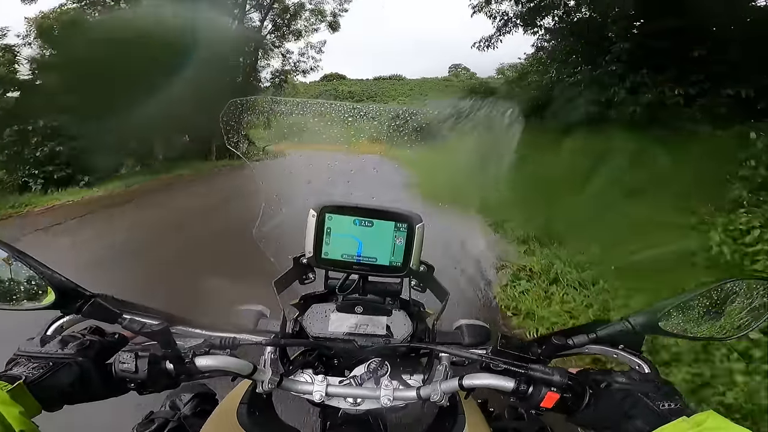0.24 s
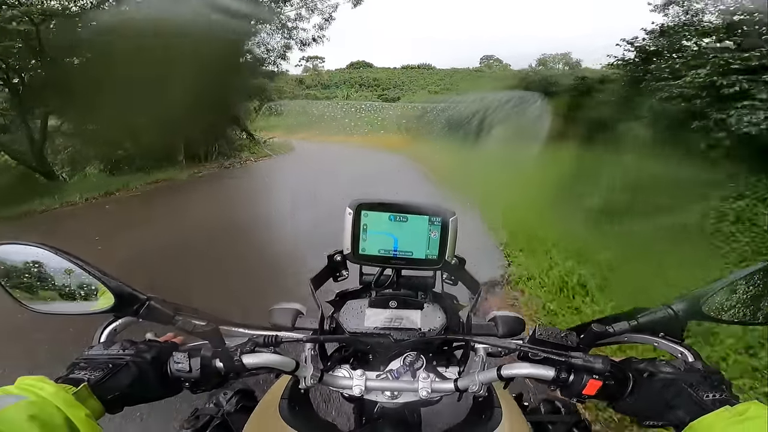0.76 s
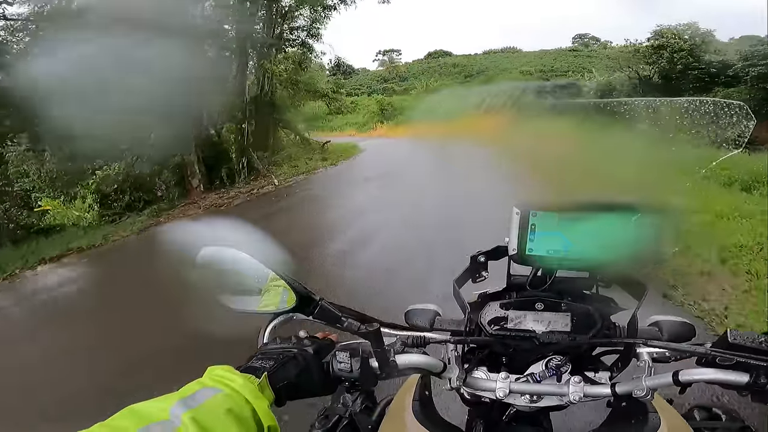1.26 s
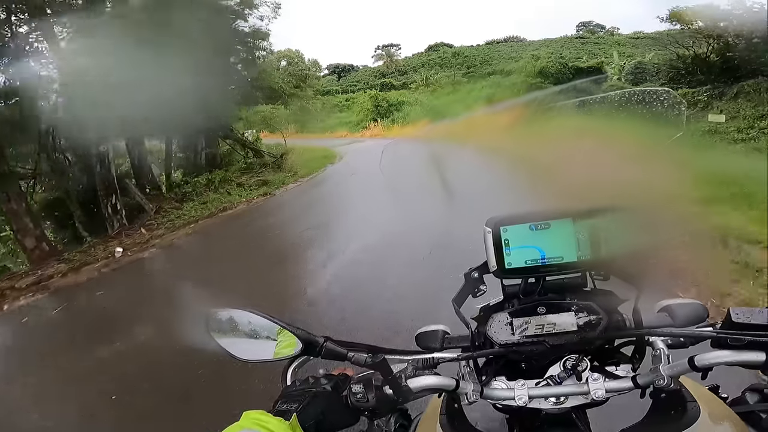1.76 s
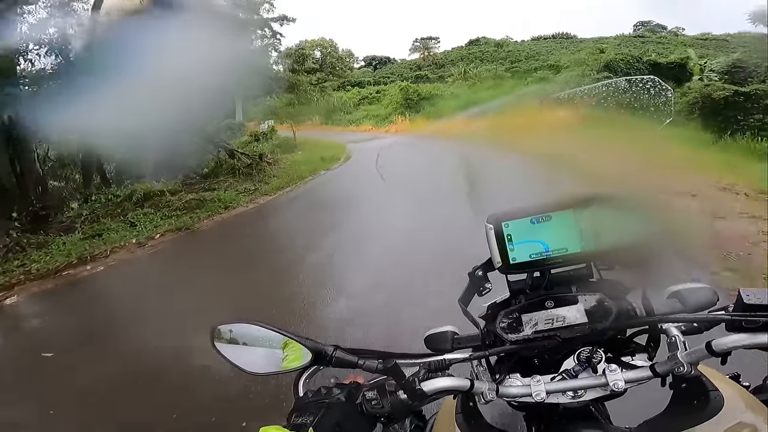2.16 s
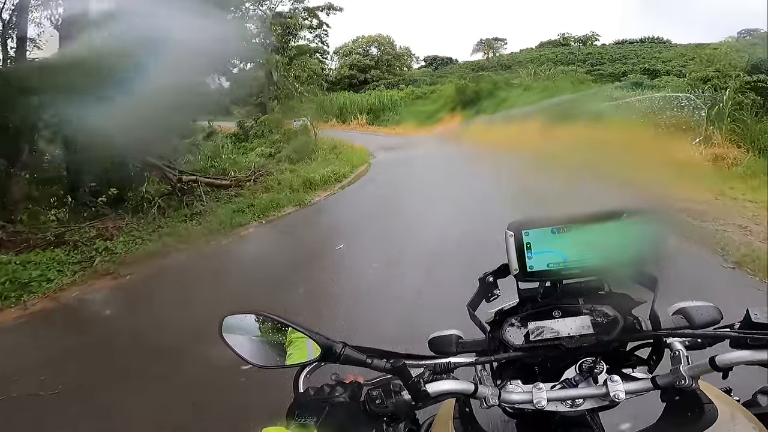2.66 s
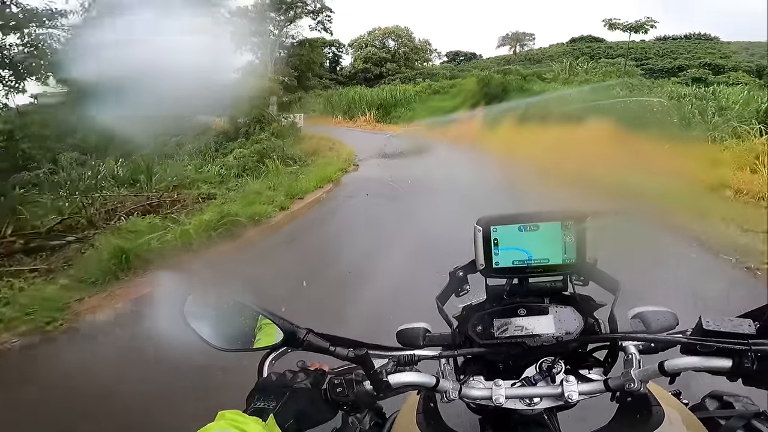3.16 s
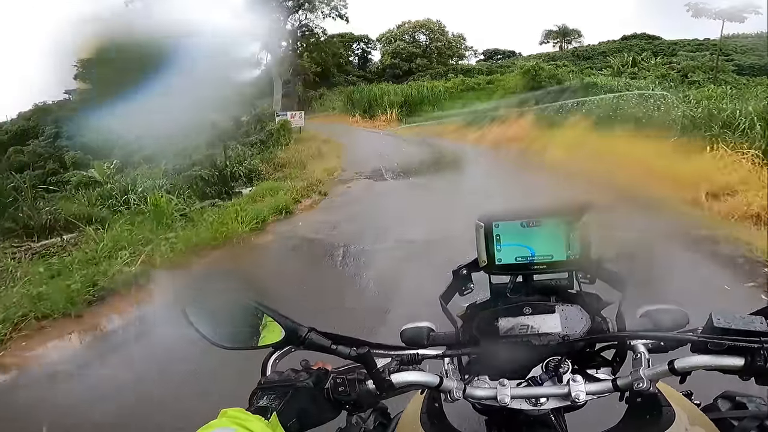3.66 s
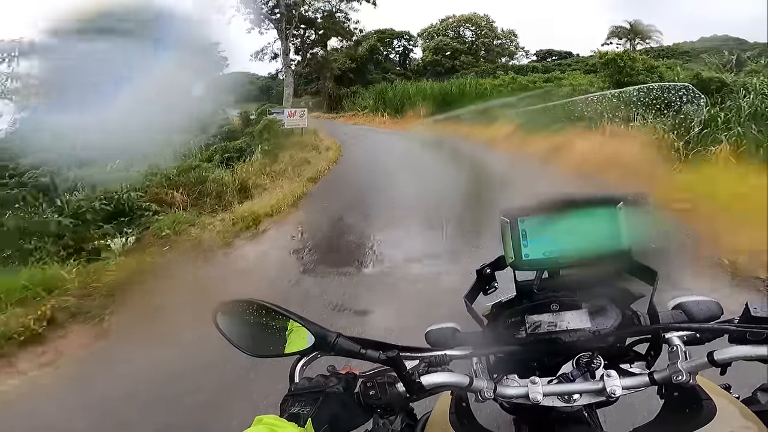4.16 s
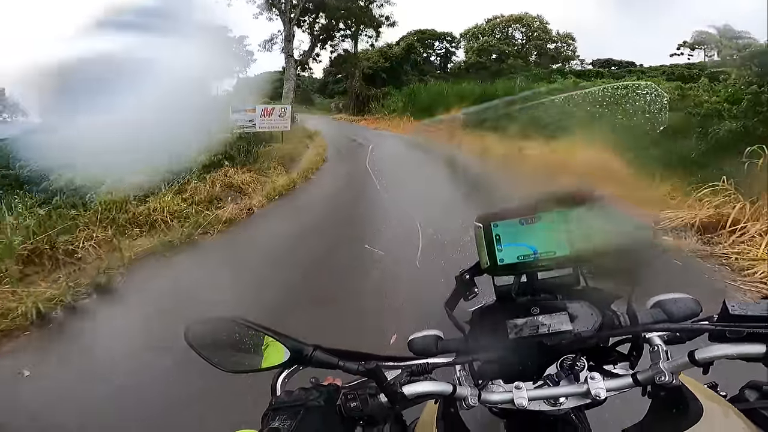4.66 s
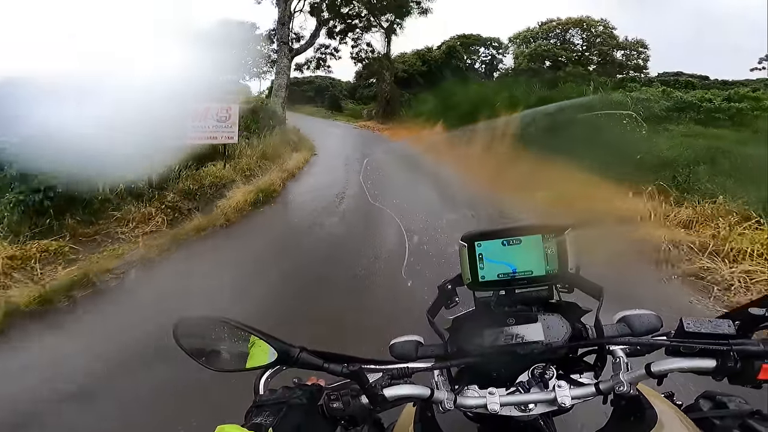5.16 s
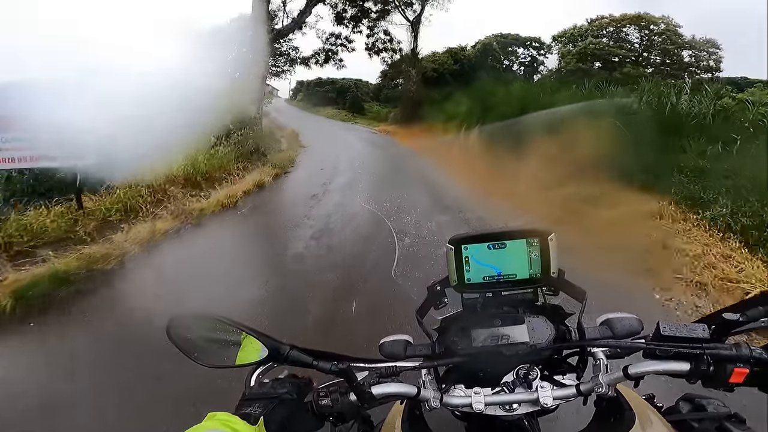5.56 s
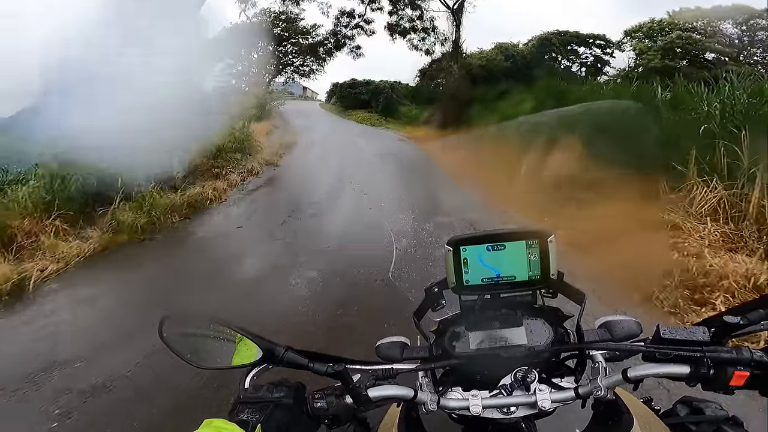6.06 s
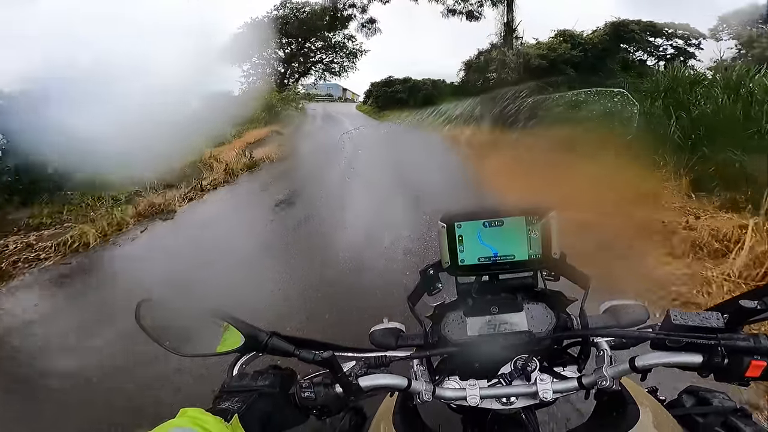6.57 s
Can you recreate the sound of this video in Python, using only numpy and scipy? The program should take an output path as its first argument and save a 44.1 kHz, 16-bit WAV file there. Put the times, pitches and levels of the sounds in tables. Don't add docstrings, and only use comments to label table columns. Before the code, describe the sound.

A single-cylinder motorcycle runs on a wet country road, heard from the rider's helmet. The engine eases down at first, knocking and whirring, then slowly climbs. Low wind lumps and slaps overload the microphone, tyres roar with hissing spray, and water drops crack nearby past four seconds. At about six seconds the throttle snaps open and the engine jumps higher, clattering and pinging.

```python
import sys
import numpy as np
from scipy import signal
from scipy.fft import rfft, irfft
from scipy.io import wavfile
from scipy.ndimage import uniform_filter1d

SR = 44100
rng = np.random.default_rng(int(sys.argv[2]) if len(sys.argv) > 2 else 0)


def to_wav(sig):
    pcm = np.clip(np.atleast_2d(sig), -1, 1) * 32767
    pcm = np.round(pcm).astype(np.int16)
    wavfile.write(sys.argv[1], SR, pcm.T)


def invert_db(level):
    return 10 ** (np.asarray(level, dtype=float) / 20)


N = 300446
TIME = np.arange(N) / SR

# frequency in Hz, width in Hz, level in dB.
PING_MODES = [(3660, 340, 0), (3950, 300, -5), (2100, 250, -8)]


def evened(x):
    return x / np.sqrt(np.mean(x ** 2) + 1e-20)


def steadied(x, size):
    power = uniform_filter1d(uniform_filter1d(x ** 2, size), size)
    return x / np.sqrt(power + 1e-3)


def curves(rows):
    s, *columns = np.transpose(rows)
    return [np.interp(TIME, s, c) for c in columns]


def swell(middle_s, length_s):
    return np.cos(np.pi * np.clip((TIME - middle_s) / length_s, -.5, .5)) ** 2


def add(mix, s, sound):
    part = mix[round(s * SR):][:len(sound)]
    part += sound[:len(part)]


def ring(x, modes):
    out = np.zeros(len(x))
    for k, (hz, width, db) in enumerate(modes):
        pole = np.exp((2j * np.pi * hz - np.pi * width) / SR)
        out += (-1) ** k * invert_db(db) * signal.lfilter([1 - abs(pole)], [1, -pole], x).imag
    return out


def ring_twice(x, mode):
    return ring(ring(x, [mode]), [mode])


def noise(spectrum, size, patchy_db, flicker_db):
    frames, hz = 4 * N // size + 5, np.fft.rfftfreq(size, 1 / SR)
    a, b, patches = rng.standard_normal((frames, len(hz), 3)).T
    patches = evened(uniform_filter1d(uniform_filter1d(patches, size=8, axis=0), size=12, axis=1))
    flicker = evened(uniform_filter1d(rng.standard_normal(frames), size=4))
    f, db = np.transpose(spectrum)
    colour_db = np.interp(np.log(hz + 1), np.log(f + 1), db, left=-90, right=-90)[:, None]
    z = (a + 1j * b) * invert_db(colour_db + patchy_db * patches + flicker_db * flicker)
    return evened(signal.istft(z, nperseg=size, noverlap=3 * size // 4)[1][:N])


def beats(turns, pattern, jitter, spread_db):
    out, cycle = np.zeros(N), np.arange(int(turns[-1]))
    for place, db in pattern:
        late, size = rng.standard_normal((len(cycle), 2)).T
        at = np.searchsorted(turns, cycle + place + jitter * late)
        np.add.at(out, np.minimum(at, N - 1), invert_db(db + spread_db * size))
    return out


def puffs(clicks, decay_s):
    return signal.lfilter([1], [1, -np.exp(-1 / (decay_s * SR))], clicks) * rng.standard_normal(N)


def engine():
    # time in seconds, engine cycles per second in Hz.
    revs = [(0.0, 30.99), (0.45, 28.28), (0.7, 28.22), (1.0, 26.71), (1.7, 25.83), (2.1, 26.77),
            (3.5, 28.0), (3.8, 28.72), (4.45, 29.06), (4.7, 29.889), (5.3, 29.563), (5.94, 29.752),
            (6.02, 35.823), (6.22, 34.907), (6.35, 39.344), (6.44, 39.086), (6.5, 36.901), (6.82, 36.622)]
    # time in seconds, strength of the burn in dB, gear whirr against the knock 0-1.
    load = [(0, -31.5, 0.9), (.75, -38, 1), (1.1, -39.5, 1), (1.75, -37.5, 1), (2.1, -36.5, 1),
            (2.6, -32, 0.9), (3.3, -34, 1), (3.9, -34, 1), (4.5, -32.5, 1), (4.8, -32, 0), (5.2, -35, 0.9),
            (5.55, -32, 0.1), (5.9, -37.5, 1), (6.1, -34, 0.9), (6.28, -30, 1), (6.5, -25, 1),
            (6.81, -24, 0.9)]
    # time in seconds, then shares 0-1 of intake tick, pinging, throttle wide open, coasting.
    throttle = [(0, .9, 0, 0, 0), (.55, .9, 0, 0, 0), (.65, .9, 0, 0, 1), (2.02, .9, 0, 0, 1),
                (2.1, .9, 0, 0, .1), (3.2, .9, 0, 0, .1), (3.3, .9, 0, 0, .5), (4.15, .9, 0, 0, .5),
                (4.3, .1, 0, 0, .3), (4.6, .1, 0, 0, 0), (5.93, .1, 0, 0, 0), (5.98, .1, 0, 1, 0),
                (6.19, .1, .1, 1, 0), (6.21, .1, 1, 1, 0), (6.3, .1, 1, 1, 0), (6.81, .1, 1, 1, 0)]
    speed = curves(revs)[0]
    turns = np.cumsum(speed) / SR
    burn_db, whirr = curves(load)
    intake, pinging, wide_open, coasting = curves(throttle)
    extra_db = burn_db + 35
    shaken = cases(turns, whirr, wide_open, coasting)
    body = invert_db(burn_db) * (gear_whine(turns, pinging) + invert_db(-2.0) * shaken)
    body += exhaust(turns, extra_db, wide_open)
    head = valves(turns, intake, pinging, wide_open) + 1.9 * evened(pings(turns, pinging))
    body += invert_db(-58.5 + 0.11 * extra_db + wide_open) * head
    return body + frame_boom(speed, turns, wide_open) + drone(turns) + open_orders(turns, wide_open)


def exhaust(turns, extra_db, wide_open):
    # place in the cycle 0-1, level in dB.
    pulse = [(.32, 0)]
    # frequency in Hz, width in Hz, level in dB.
    pipe_modes = [(128, 22, -58), (195, 44, 11), (279.2, 20, 22.5), (341, 53, 11), (400, 13, -13),
                  (466, 50, -5.5), (535, 45, -7.5)]
    # time in seconds, pipe strength against the burn in dB, bark of the upper modes in dB,
    # lag of the pulse in cycles.
    filling = [(0, -7.5, -7, 0.0036), (.55, -12, -1, .04), (.9, -3.5, -3.5, 0.055), (1.9, -4, -6, 0.051),
               (2.15, 0, 1, 0.068), (2.6, -4, 2.5, 0.075), (3.6, -1, -4, 0.038), (4.5, -0.5, -8.5, -0.051),
               (5.3, -4.5, -2, -0.067), (5.9, -1.5, -10.5, -0.027), (6.2, -5, 2, -0.021),
               (6.81, 1, -4, -0.044)]
    fill_db, bark_db, lag = curves(filling)
    low = evened(ring(beats(turns - lag, pulse, jitter=.002, spread_db=1.2), pipe_modes[:5]))
    burn = beats(turns, [(.06, 0), (.06 + .13, -4)], jitter=.002, spread_db=1.5)
    bark = evened(ring(burn, pipe_modes[5:]))
    pipe = invert_db(-13 * wide_open) * low + invert_db(-2.5 + bark_db) * bark
    return invert_db(-34.5 + .4 * extra_db + fill_db) * pipe


def cases(turns, whirr, wide_open, coasting):
    # place in the cycle 0-1, level in dB.
    burn_beats = [
        (.015, 0),
        (.15, -12),
    ]
    # place in the cycle 0-1, level in dB.
    slack_beats = [
        (.5, -6),
        (.66, -5),
    ]
    # time in seconds, extra level in dB.
    hard_firings = [(0.475, 2), (2.118, 6.5), (2.156, 4.5), (2.6, 4), (2.746, 4), (3.11, 8), (3.682, 10),
                    (3.821, 7), (4.682, 6.5), (4.749, 6), (4.782, 5), (4.85, 5), (4.951, 6.5), (5.355, 1),
                    (5.559, 2.5), (6.079, 10), (6.132, 10), (6.19, 9.5), (6.302, 6), (6.329, 8),
                    (6.454, 6.5), (6.537, -6), (6.698, 4)]
    # frequency in Hz, width in Hz, level in dB.
    case_modes = [(640, 97, -30), (733.6, 2.2, 9.5), (805.8, 18, 9), (856, 32, -3.5), (900, 18, -44),
                  (1208, 24, -1.5), (1900, 120, -42), (2120, 21, -2), (2080, 220, -23)]
    # frequency in Hz, width in Hz, level in dB.
    crack_modes = [(654, 463, -13), (803, 158, 12.5), (1060, 226, -3.5), (1260, 172, 3), (1887, 377, -14.5)]
    knock = (1 - .3 * coasting - .3 * wide_open) * beats(turns, burn_beats, jitter=.003, spread_db=1.1)
    knock *= invert_db(sum(db * (abs(TIME - s) < .009) for s, db in hard_firings))
    slack = beats(turns, slack_beats, jitter=.01, spread_db=2.5)
    knock += (.3 + .75 * coasting + .3 * wide_open) * slack
    blow = .4 * evened(ring(knock, case_modes))
    blow += .12 * evened(ring(puffs(knock, decay_s=.003), case_modes))
    crack = np.zeros(N)
    for mode in crack_modes:
        hz, width, db = mode
        struck = knock + .05 * puffs(knock, decay_s=.002)
        crack += ring_twice(struck, mode) * width / invert_db(db)
    blow += .85 * evened(crack)
    gears = evened(ring(rng.standard_normal(N), case_modes))
    return evened(blow + .36 * whirr * gears)


def gear_whine(turns, pinging):
    wobble = uniform_filter1d(rng.standard_normal((N, 2)), size=600, axis=0).T
    mesh = 2 * np.pi * 48 * turns
    whine = evened(wobble[0] * np.cos(mesh) + wobble[1] * np.sin(mesh))
    return invert_db(-17 - 3 * pinging) * whine


def valves(turns, intake, pinging, wide_open):
    # frequency in Hz, width in Hz, level in dB.
    head_modes = [(3520, 44, 9), (3620, 140, -3.5), (4320, 46, -5), (4500, 60, -55), (5920, 32, 5),
                  (6850, 51, 3.5), (9240, 170, -9)]
    # middle in seconds, length in seconds, level in dB.
    clatter = (6.02, 0.09, 0.76)
    middle_s, length_s, clatter_db = clatter
    closing = [(.41, 0), (.62, -5), (.06, -6), (.16, -6)]  # (place in the cycle 0-1, dB)
    ticks = beats(turns, closing, jitter=.005, spread_db=2.5)
    ticks += intake * beats(turns, [(.87, 0)], jitter=.006, spread_db=2.5)
    opening = 1.3 + 2 * invert_db(clatter_db) * swell(middle_s, length_s) ** .5
    open_ticks = beats(turns, [(.77, 0), (.9, -4)], jitter=.006, spread_db=2.)
    ticks += opening * wide_open * (1 - pinging) * open_ticks
    rattle = signal.oaconvolve(ticks, signal.windows.hann(90))[:N] * rng.standard_normal(N)
    shake = .7 * evened(ticks) + .4 * evened(rattle) + .4 * rng.standard_normal(N)
    dry_tick = evened(sum(ring_twice(ticks, mode) for mode in PING_MODES[:2]))
    return (1 + .25 * pinging) * evened(ring(shake, head_modes)) + dry_tick


def frame_boom(speed, turns, wide_open):
    resonance = 1 / (1 + ((4 * speed - 160) / 18) ** 2)
    fourth = invert_db(-37 + 12 * wide_open) * np.sin(2 * np.pi * 4 * turns) * resonance
    return fourth + invert_db(-38) * (1 - wide_open) * np.sin(2 * np.pi * 5 * turns)


def drone(turns):
    panel = (.06, .6, -27)
    s, length, db = panel
    tone = np.sin(2 * np.pi * 3 * turns) + .28 * np.sin(2 * np.pi * 7 * turns)
    return invert_db(db) * swell(s + length / 2, length) ** .25 * tone


def open_orders(turns, wide_open):
    # multiple of the cycle rate, level in dB, place in the cycle 0-1.
    singing = [(3, -38, .35), (5, -46, .35), (8, -38, .35), (9, -45, .35), (11, -44, .35), (16, -45, .1),
               (17, -45, .1), (19, -45, .1), (22, -39, .1)]
    stack = sum(invert_db(-.1 * k) * np.cos(2 * np.pi * k * (turns - .06 - .08)) for k in range(11, 22))
    sung = sum(invert_db(db) * np.cos(2 * np.pi * k * (turns - place)) for k, db, place in singing)
    return invert_db(-51 - wide_open) * stack + wide_open * sung


def pings(turns, pinging):
    # time in seconds, share lost 0-1.
    soft_burns = [(6.244, .75), (6.299, .75), (6.377, .7), (6.428, .4), (6.671, .4), (6.779, .4)]
    clicks = pinging * beats(turns, [(.91, 0), (.52, -10), (.7, -14)], jitter=.004, spread_db=1.)
    clicks *= 1 - sum(lost * swell(s - .002, .024) ** .25 for s, lost in soft_burns)
    return sum(ring_twice(clicks + .05 * puffs(clicks, decay_s=.002), mode) for mode in PING_MODES)


def wind():
    # middle in seconds, length in seconds, level in dB.
    gusts = [(0.007, 0.59, -10), (0.38, 0.53, -13.5), (0.678, 0.13, -10), (0.978, 0.32, -12.5),
             (1.43, .2, -15), (1.59, 0.074, -5), (1.72, 0.32, -9), (1.9, 0.17, -5.5), (2.148, 0.28, -9.5),
             (2.35, 0.75, -10.5), (2.367, 0.075, -6.5), (2.616, 0.19, -8.5), (2.737, 0.17, -8.5),
             (2.985, 0.46, -8.5), (3.123, 0.5, -13), (3.37, 0.48, -10.5), (3.663, 0.24, -9),
             (3.983, 0.38, -10.5), (4.31, 0.083, -12), (4.5, 0.26, -5), (4.606, 0.18, -9),
             (4.925, 0.23, -6.5), (5.002, 0.076, -2), (5.11, 0.06, -6), (5.52, 0.51, -11),
             (5.722, 0.058, -7.5), (5.94, 0.19, -6), (6.26, 0.74, -12), (6.44, 0.26, -8),
             (6.656, 0.14, -19), (6.805, 0.31, -10.5)]
    gust_power = sum((invert_db(db) * swell(s, length)) ** 2 for s, length, db in gusts)
    strength = np.sqrt(invert_db(-17) ** 2 + gust_power)
    out = rumble(strength) + flutter(strength) + buffets() + slaps()
    return .8 * np.tanh(out / .8)


def rumble(strength):
    # frequency in Hz, level in dB per Hz.
    wind_spectrum = [(1.8, -31), (3.0, 6), (22, 5.5), (34, -7), (60, -13.5), (120, -28), (200, -120)]
    air = noise(wind_spectrum, size=8192, patchy_db=-2.6, flicker_db=-3.5)
    heave = signal.sosfiltfilt(signal.butter(2, 16.8, fs=SR, output="sos"), air)
    lumps = steadied(evened(air - heave), size=2500)
    return strength * (invert_db(-4.5) * steadied(heave, size=5000) + invert_db(-8) * lumps)


def flutter(strength):
    # frequency in Hz, level in dB per Hz.
    flutter_spectrum = [(40, -30), (70, -7.5), (120, -20), (200, -11), (400, -22.5), (900, -21)]
    level = invert_db(-34.5) * (strength / invert_db(-16.5)) ** 0.39
    air = noise(flutter_spectrum, size=512, patchy_db=-3.5, flicker_db=-0.5)
    return level * steadied(air, size=3000)


def buffets():
    # middle in seconds, peak in dB, frequency in Hz.
    thumps = [(0.036, -20, 63), (0.1, -29, 71), (0.291, -26, 73), (0.382, -27, 67), (0.529, -17, 79),
              (0.782, -11.5, 100), (0.932, -20, 55), (0.978, -20, 73), (1.394, -12, 55.4), (1.537, -16, 62),
              (1.695, -24, 65), (1.763, -23, 74), (1.822, -10, 57), (1.895, -23, 69), (1.93, -16, 100),
              (2.115, -16, 88), (2.152, -18, 48), (2.194, -22, 58), (2.255, -18, 57), (2.303, -17, 55),
              (2.344, -3, 49.4), (2.43, -16, 50), (2.505, -9, 50), (2.546, -11.5, 48.3), (2.593, -18, 54),
              (2.653, -8.5, 64.6), (2.81, -7.5, 68.6), (2.905, -6, 53), (3.028, -25, 59), (3.346, -10, 65),
              (3.393, -16, 55), (3.59, -17, 56), (4.082, -24, 62), (4.289, -23, 57), (4.356, -20, 65),
              (4.428, -11, 53), (4.492, -9, 55), (4.543, -16, 58), (4.617, -9, 68.4), (4.66, -25, 63),
              (4.816, -12, 59), (4.867, -8, 51.3), (4.919, -12, 60), (5.01, -17, 67), (5.08, -15, 89),
              (5.136, -11, 68), (5.561, -24, 49), (5.742, -7.5, 61), (5.916, -24, 81), (6.036, -20, 65),
              (6.124, -18, 56), (6.302, -12, 65), (6.39, -25, 59), (6.49, -7.5, 64), (6.791, -13, 63)]
    out = np.zeros(N)
    for (s, db, hz), start in zip(thumps, rng.random((len(thumps), 1))):
        cycles = hz * (TIME[:SR // 10] - min(s, .05))
        bell = np.exp(-(cycles / .75) ** 2)
        add(out, max(s - .05, 0), invert_db(db - 4.5) * bell * np.cos(2 * np.pi * (cycles + start)))
    return out


def slaps():
    # start in seconds, peak in dB, 60 dB decay in seconds, first suck in dB against the peak.
    gust_slaps = [(0.096, -15, 0.095, -22), (0.769, -16, 0.084, -10), (1.287, -22, 0.05, 3),
                  (1.788, -6.5, 0.03, -22), (1.835, 5.5, 0.012, -18), (1.896, -12.5, 0.037, -3),
                  (1.928, -18, 0.12, 5), (2.439, -12, 0.029, 1), (3.361, -11, 0.045, -11),
                  (4.857, -18.5, 0.0081, 9), (5.063, 2.5, 0.015, -3.5), (5.0692, -5, 0.047, -37),
                  (5.136, -11, 0.044, -13), (5.739, -20, 0.058, -10), (5.899, -14, 0.03, -14),
                  (6.116, -26, 0.045, 13), (6.472, -14, 0.0073, 15)]
    out, t = np.zeros(N), np.arange(4000) / SR
    hz = 168 * (0.706 + 2.37 * np.exp(-t / 0.0014))
    push = np.sin(2 * np.pi * np.cumsum(hz) / SR) * np.minimum(t / 0.0035, 1) ** 2
    suck = np.exp(-((t - .0035) / 0.00046) ** 2)
    for s, db, t60, suck_db in gust_slaps:
        add(out, s, -invert_db(db + suck_db) * suck)
        add(out, s, invert_db(db - 60 * t / t60) * push)
    return out


def road():
    # time in seconds, water thrown up by the tyres in dB.
    spray = [(0, -44), (.8, -46), (1.3, -46.5), (2.4, -42.5), (3.1, -43), (4.3, -42.5), (4.8, -42.5),
             (5.2, -48.5), (5.5, -46), (5.8, -46.5), (5.93, -48), (5.98, -42.5), (6.1, -43), (6.25, -43.5),
             (6.43, -37.5), (6.58, -42), (6.81, -39.5)]
    # frequency in Hz, level in dB per Hz.
    hiss_spectrum = [(1350, -40), (2300, -4.5), (3170, -10), (3570, 2), (4260, -8), (5380, -6), (6730, -4),
                     (8900, -6.5), (14700, -18), (15600, -15)]
    # frequency in Hz, level in dB per Hz.
    roar_spectrum = [(100, 10.5), (250, 5.5), (600, 7), (950, 3), (1500, -1.5), (2200, -7), (2500, -11),
                     (5000, -20)]
    spray_db = curves(spray)[0]
    falls = rng.random(N) < 25 / SR
    drops = invert_db(10 * np.minimum(rng.exponential(1, N), 1.8)) * falls
    grain = 1 + 0.28 * signal.lfilter([1], [1, -np.exp(-1 / (0.0027 * SR))], drops)
    hiss = evened(grain * noise(hiss_spectrum, size=256, patchy_db=1.0, flicker_db=0.8))
    roar = noise(roar_spectrum, size=512, patchy_db=0.9, flicker_db=1.53)
    return invert_db(spray_db - 2.2) * hiss + invert_db(spray_db + 9.5) * roar


def whistles():
    # start in seconds, length in seconds, frequency in Hz, width in Hz, level in dB.
    whistling = [(0.621, 1.3, 1278, 75, -45.5), (0.696, 0.089, 1640, 120, -43),
                 (1.748, 0.31, 1800, 300, -46.5), (2.2, 0.13, 6800, 350, -50),
                 (2.228, 0.3, 1700, 200, -40.5), (2.247, 0.35, 4500, 350, -52),
                 (3.188, 0.49, 1740, 320, -42), (4.401, 0.29, 1970, 150, -45),
                 (4.926, 0.11, 6740, 400, -52), (5.4, 0.28, 6800, 400, -60), (5.861, 0.3, 675, 60.5, -34.5),
                 (0.6, 0.28, 816, 80, -35), (1.12, 0.065, 820, 80, -37), (1.25, 0.11, 825, 80, -39.5),
                 (1.618, 0.087, 830, 80, -41.5), (0.307, 1.4, 9300, 2500, -55)]
    out = np.zeros(N)
    for s, length, hz, width, db in whistling:
        air = rng.standard_normal(SR * 2)[:round(length * SR)]
        tone = ring_twice(air, (hz, 1.6 * width, 0))
        add(out, s, invert_db(db) * evened(tone) * signal.windows.tukey(len(air), .6))
    return out


def splashes():
    # start in seconds, peak in dB, centre in Hz, 60 dB decay in seconds, width in octaves.
    strikes = [(1.5105, -31, 3550, 0.04, 1.8), (2.1694, -38, 5790, 0.04, 1.5),
               (2.476, -14, 2570, 0.023, 5.4), (2.629, -23, 3800, 0.087, 2.4),
               (3.3064, -33, 2500, 0.04, 1.8), (3.477, -21.5, 3430, 0.052, 1.8),
               (3.66, -29, 3490, 0.03, 1.7), (3.917, -16, 3800, 0.027, 1.2), (4.154, -27, 3510, 0.04, 1.7),
               (4.2418, -3.5, 3170, 0.018, 1.5), (4.286, -16, 2780, 0.042, 1.6),
               (4.365, -21, 2800, 0.02, 1.2), (4.388, -17, 8000, 0.025, 3),
               (4.423, -10.5, 4550, 0.024, 1.3), (4.532, -19, 2790, 0.035, 3.3),
               (4.604, -4.5, 5050, 0.02, 4.3), (4.683, -26, 4000, 0.02, 2.5),
               (4.692, -10.5, 6500, 0.026, 1.5), (4.7566, -29, 3410, 0.04, 1.3),
               (4.926, -19, 3520, 0.034, 3.3), (5.5794, -25, 2800, 0.04, 2.5),
               (6.065, -14, 3490, 0.023, 2.7), (6.696, -5, 3520, 0.013, 2.2)]
    out = np.zeros(N)
    t, f = np.arange(4096) / SR, np.fft.rfftfreq(4096, 1 / SR) + 1
    for (s, db, hz, t60, octaves), burst in zip(strikes, rng.standard_normal((len(strikes), 4096))):
        snap = np.diff(burst) * np.exp(-t[1:] / 0.00068)
        add(out, s, invert_db(db - 47 + 5 * octaves) * snap)
        band = np.exp(-(np.log2(f / hz) / octaves) ** 2) / (1 + (f / 9000) ** 2)
        burst = evened(irfft(rfft(burst) * band))
        add(out, s, invert_db(db - 14.5 - 60 * t / t60) * burst * np.minimum(t / .0015, 1))
    return out


def scene():
    return (engine() + wind() + road() + whistles() + splashes())[None]


def band_limit(x):
    return signal.sosfilt(signal.butter(12, 15750, fs=SR, output="sos"), x)


def record(dry):
    low_pass = signal.firwin(511, 15700, window=("kaiser", 9), fs=SR)
    mix = signal.oaconvolve(dry, low_pass[None], "same")
    return band_limit(mix)


dry = scene()
out = record(dry)
to_wav(out)
```